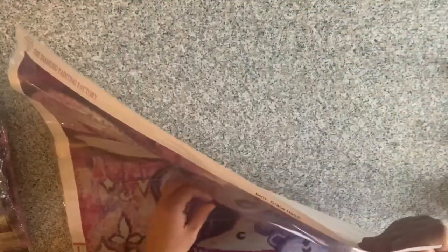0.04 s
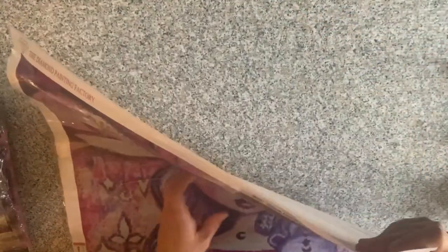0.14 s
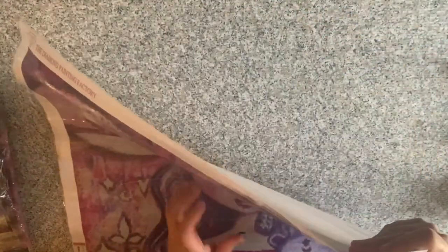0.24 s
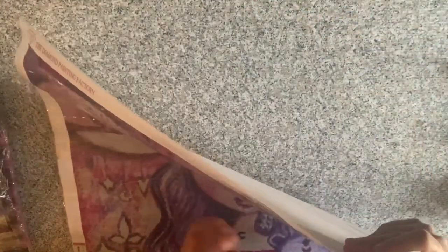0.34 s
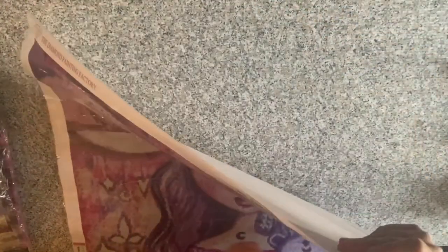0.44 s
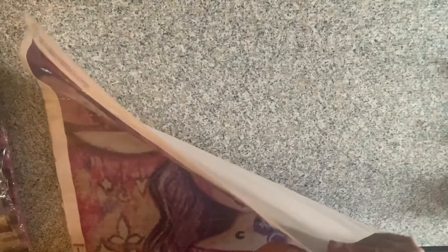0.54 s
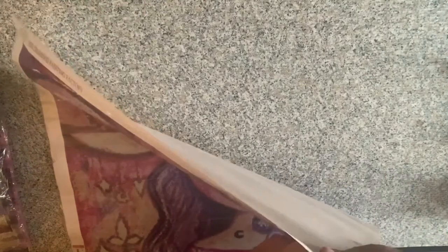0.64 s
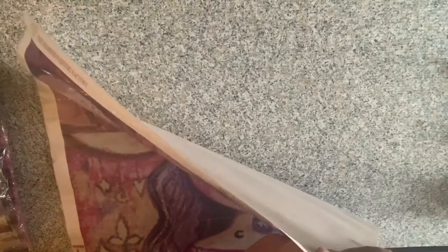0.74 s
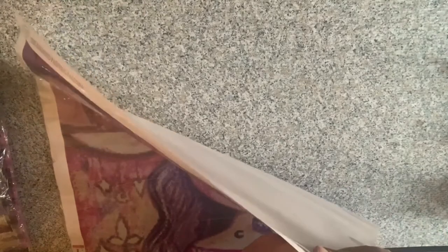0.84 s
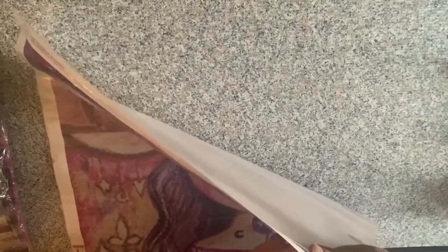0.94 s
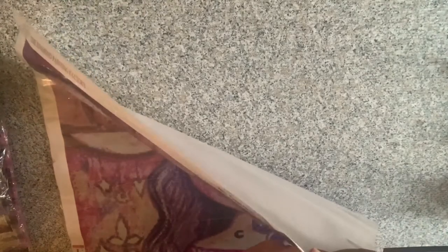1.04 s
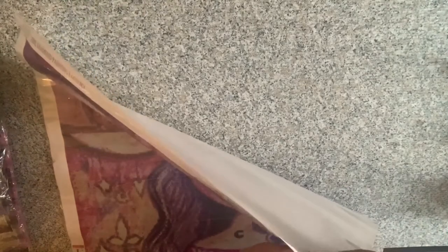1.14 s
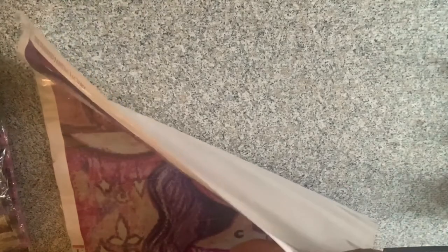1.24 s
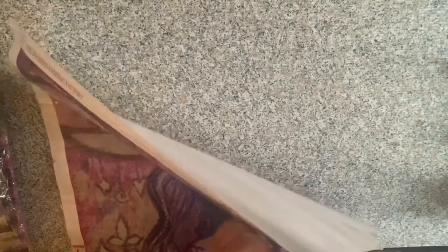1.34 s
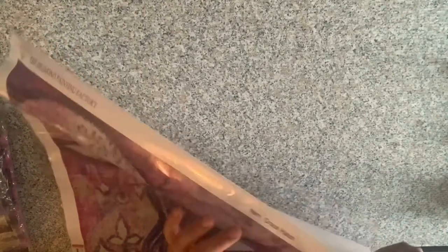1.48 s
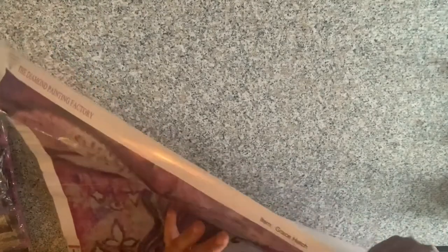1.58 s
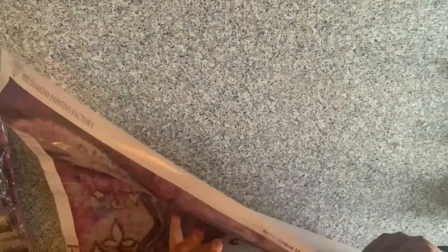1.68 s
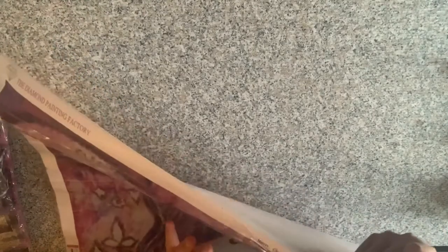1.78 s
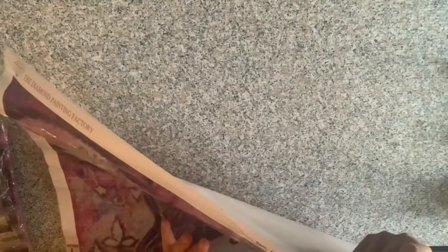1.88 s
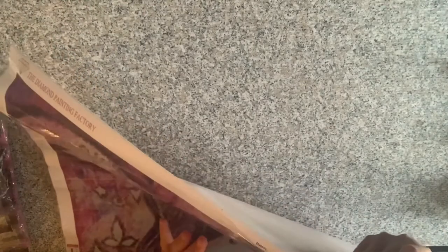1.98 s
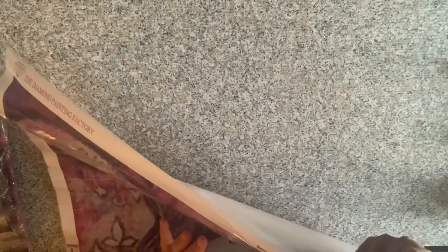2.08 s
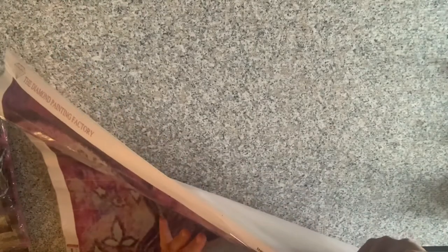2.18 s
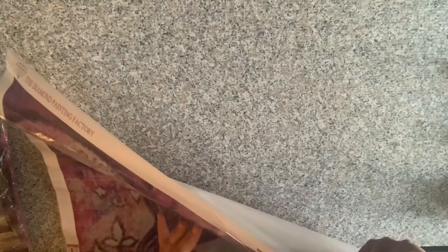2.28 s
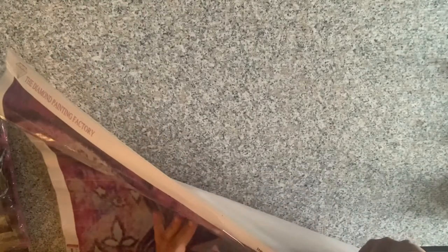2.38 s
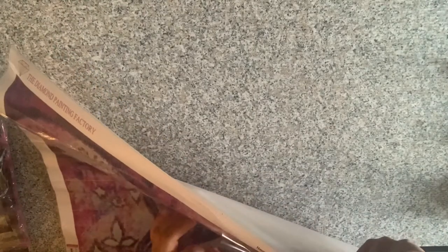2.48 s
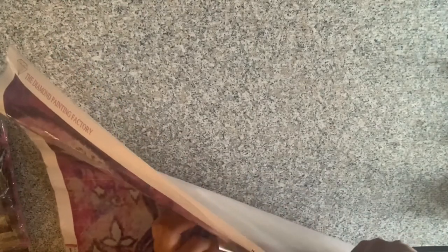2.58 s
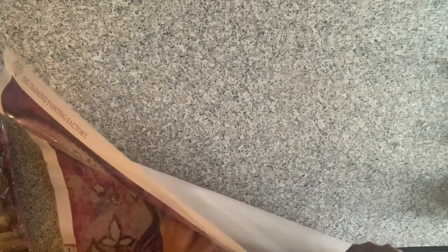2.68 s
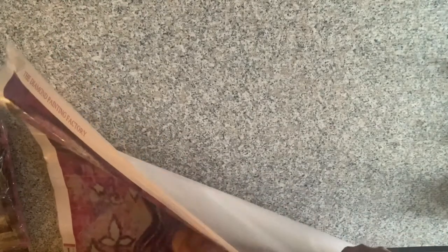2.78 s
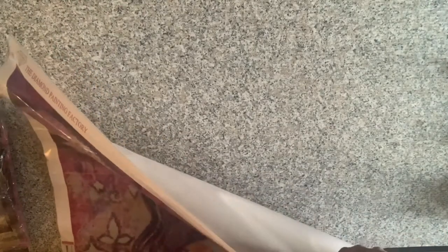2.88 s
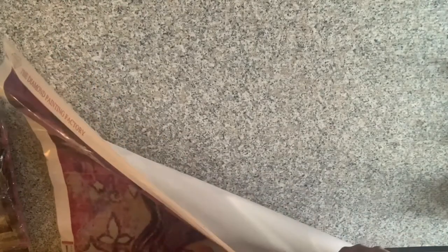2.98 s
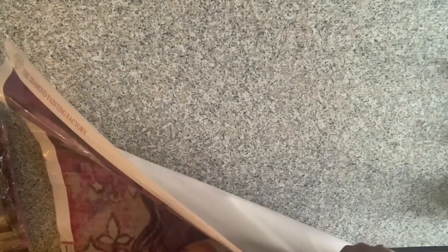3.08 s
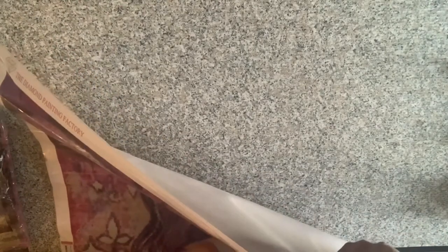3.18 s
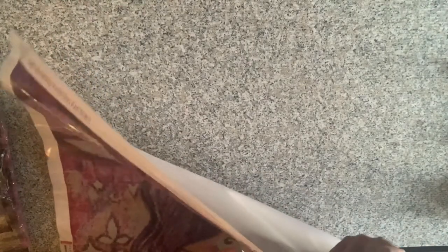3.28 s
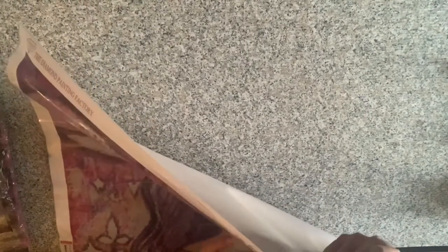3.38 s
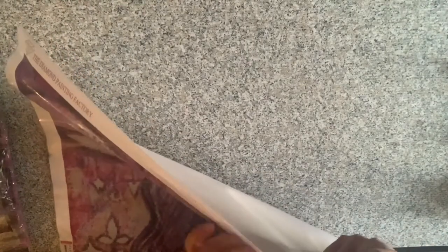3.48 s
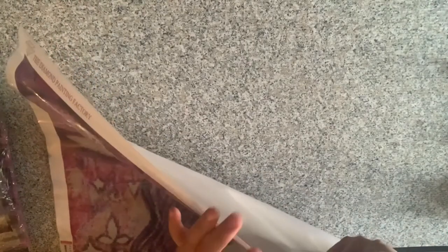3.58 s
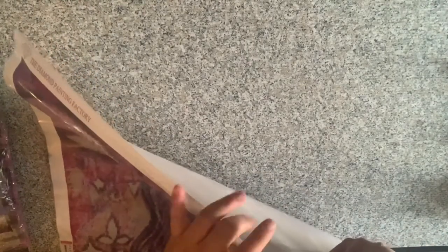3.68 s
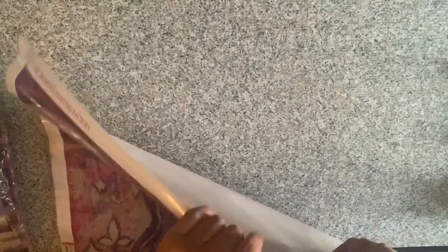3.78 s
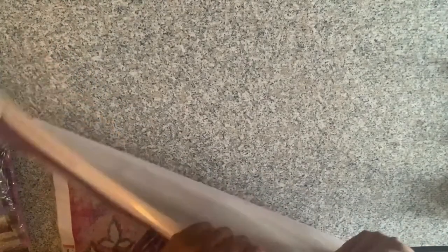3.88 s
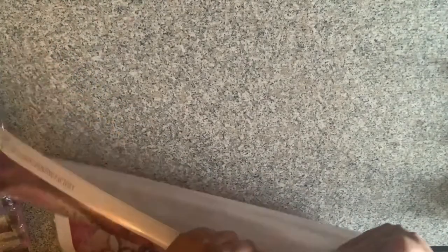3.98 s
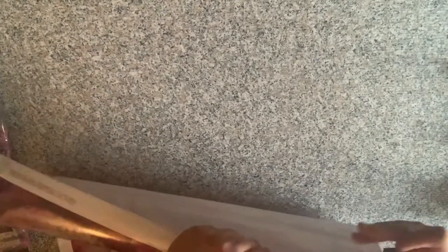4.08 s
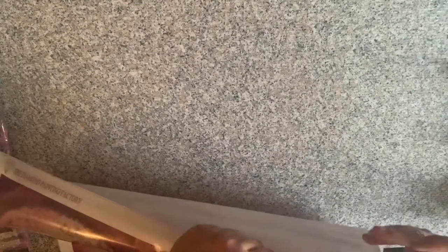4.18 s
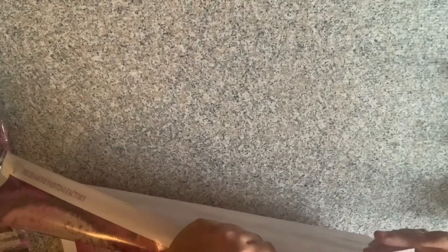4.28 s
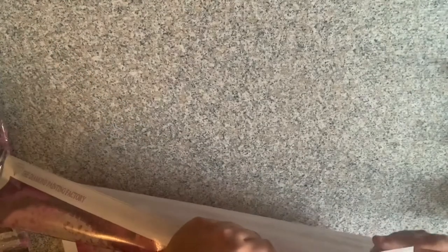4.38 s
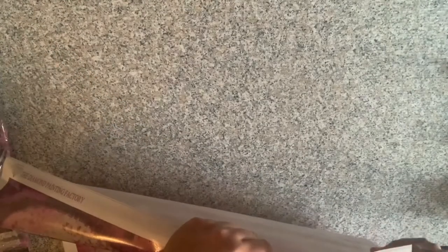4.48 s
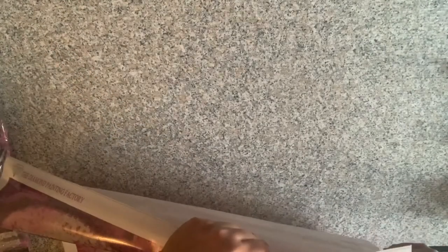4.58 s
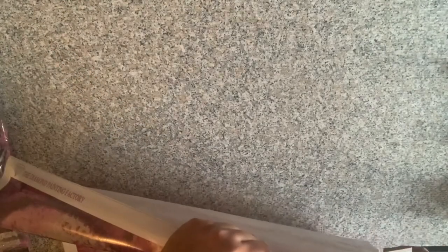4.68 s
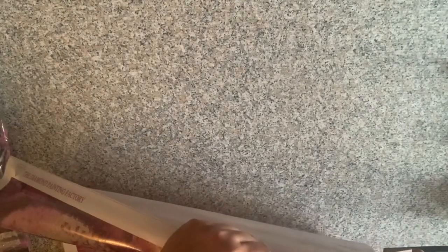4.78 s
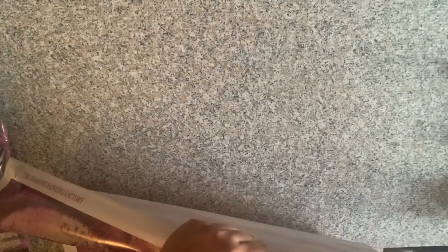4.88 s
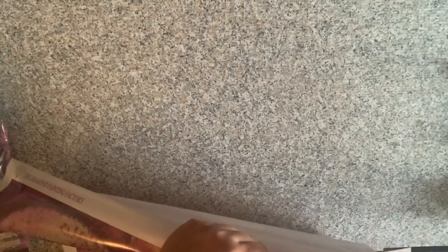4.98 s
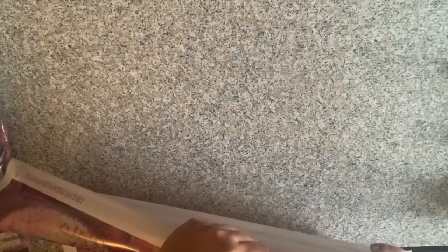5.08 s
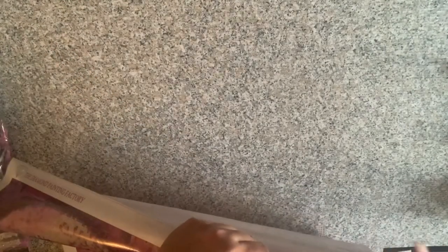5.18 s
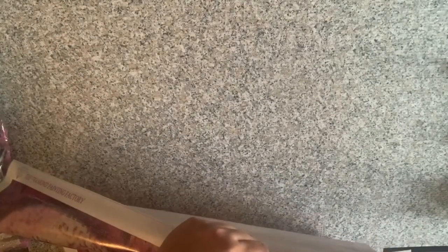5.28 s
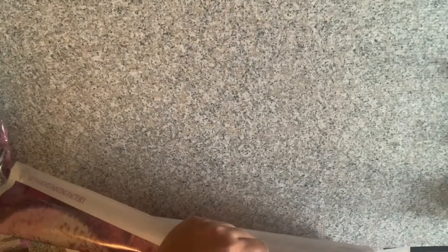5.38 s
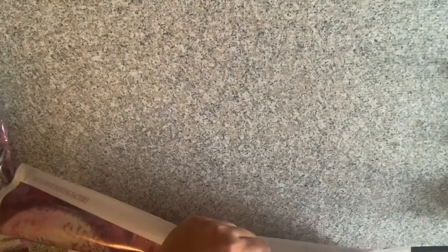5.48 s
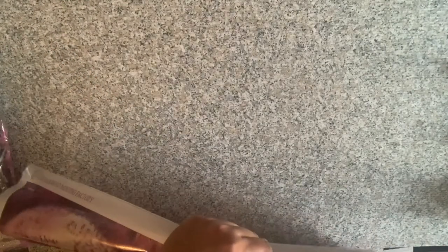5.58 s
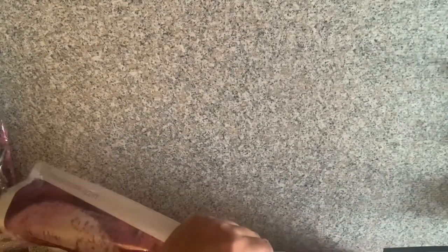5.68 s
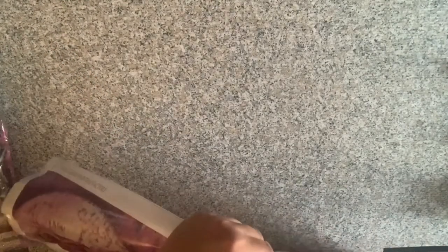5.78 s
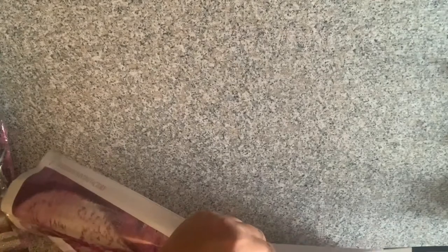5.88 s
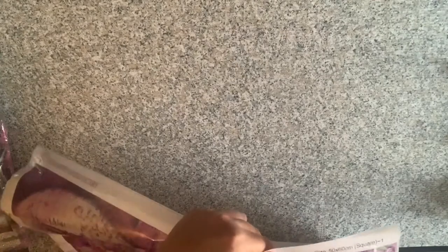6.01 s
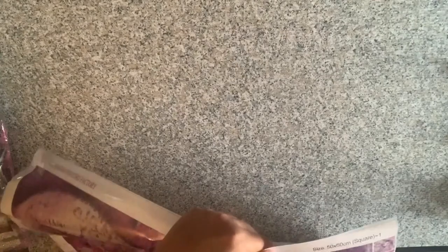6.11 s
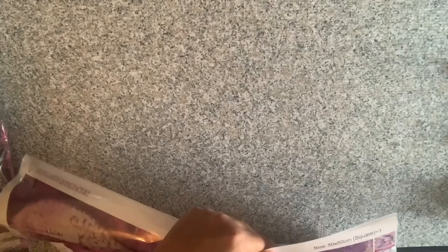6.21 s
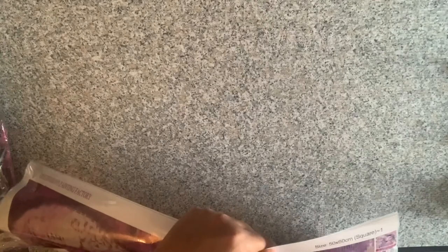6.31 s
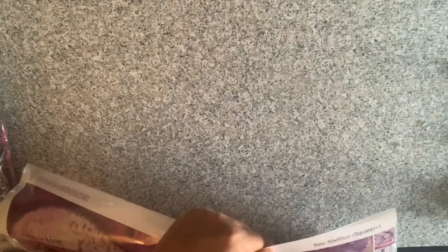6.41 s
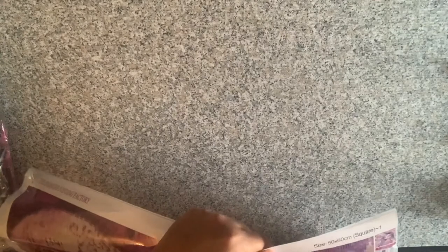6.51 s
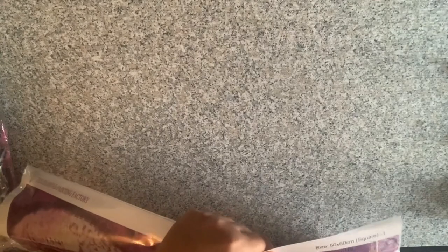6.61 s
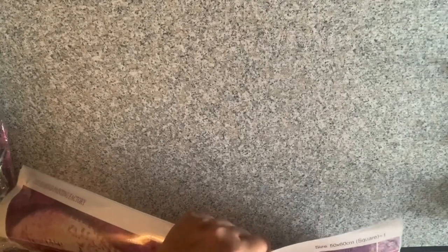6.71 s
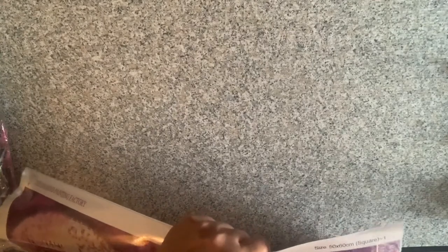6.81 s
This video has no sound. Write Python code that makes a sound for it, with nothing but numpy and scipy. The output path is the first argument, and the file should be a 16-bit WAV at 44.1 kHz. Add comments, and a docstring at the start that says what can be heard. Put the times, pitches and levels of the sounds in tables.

```python
"""Rolling up a stiff printed canvas

A canvas with a plastic cover film is lifted and rolled up by hand in a small carpeted room, over a low drone.
Creases snap as dispersed noise bursts; sliding film crackles as filtered noise that follows swarms of tiny ticks.
Hands rub the backing as dense filtered clicks, and a fingertip glides as a swish of smooth coloured noise.
The sheet flaps as damped sines, and dents pop with a chatter that rings the roll.
Beating hums, a rumble and room hiss make the background; diffuse reflections surround the canvas sounds.
"""
import sys
import numpy as np
from scipy import signal
from scipy.fft import rfft, irfft
from scipy.io import wavfile
from scipy.ndimage import uniform_filter1d

SR = 44100
rng = np.random.default_rng(int(sys.argv[2]) if len(sys.argv) > 2 else 0)


def dump_mix(stems):
    """Bounce the given channels to the path in sys.argv[1] as a 16-bit WAV at rate SR."""
    frames = np.atleast_2d(stems).T  # one column per channel
    limited = np.clip(frames, -1, 1)  # hard clip at full scale
    pcm = np.round(limited * 32767).astype(np.int16)
    wavfile.write(sys.argv[1], SR, pcm)


N = 302085

# Levels in the event tables come before the trims set in scene(), where a layer has one.
# motors humming at close speeds, so that they beat: (frequency [Hz], rms level [dB])
MOTOR_HUMS = [(59, -85), (71.5, -60.5), (75.4, -67), (120, -82.5)]
# colour of the still room: (frequency [Hz], relative power density [dB])
AIR_COLOUR = [(20, -45.5), (32, -16), (52, -3.5), (90, 5), (130, -2), (300, -8), (600, -11.5), (850, -11.5),
              (1500, -14), (3000, -25), (6000, -30.5), (10000, -33), (16000, -37.5)]
# strokes of a hand over the canvas backing:
# (time at full pressure [s], swell [s], hold [s], level [dB], brightness [dB per octave])
RUBS = [(0.0, .02, 0.0042, -41, 4.5), (0.352, .015, .02, -46.5, 1.5), (0.394, 0.046, 0.097, -38.5, -0.5),
        (0.823, .4, .02, -51.5, 0), (1.028, .08, 0.045, -51, -0.5), (1.196, .06, 0.1, -42.5, 1),
        (1.274, .1, 0.52, -37, 0), (2.16, .4, 0.23, -55, -1), (2.452, 0.19, 0.028, -49.5, 2.5),
        (2.728, .22, 0.0051, -41, 0.5), (2.95, 0.14, 0.056, -50.5, -2.5), (3.152, .3, .01, -45.5, 0.5),
        (3.361, 0.15, 0.012, -44, -0.5), (3.614, .06, 0.11, -54, -5.5), (3.9, .5, 0.034, -40, 1),
        (3.985, .1, 0.19, -49.5, 0), (4.411, 0.1, .02, -56, -0.5), (4.737, 0.016, 0.046, -46.5, 0.6),
        (5.112, 0.049, 0.093, -48.5, 0.5), (5.295, 0.14, 0.026, -48.5, 3), (5.455, 0.21, 0.04, -43.5, 0.5),
        (5.65, 0.23, 0.054, -47.5, -0.5), (5.931, 0.4, 0.057, -48.5, 3), (6.103, 0.11, 0.011, -43.5, -0.5),
        (6.211, 0.031, 0.095, -45.5, 2.5), (6.385, .08, 0.061, -49.5, -4), (6.632, 0.12, 0.0087, -46, -0.5),
        (6.797, 0.046, .06, -42, 1)]
# colour of the canvas backing: (frequency [Hz], relative power density [dB])
BACKING_COLOUR = [(60, -22), (130, -12.5), (230, -4.5), (370, -2), (460, -3), (600, -3), (830, 1),
                  (1100, -2), (1500, 0), (2300, -10), (3200, -10), (7000, -26)]
# slides of film over film:
# (time at full speed [s], swell [s], hold [s], crackle level [dB], crisp edge re crackle [dB])
SLIDES = [(0.0, .02, 0.0031, -24.5, -3), (0.255, 0.014, .02, -55.5, -10), (0.43, 0.12, .03, -46.5, -14),
          (0.505, 0.11, .01, -45, -6.5), (0.653, 0.022, .01, -44.5, -9.5), (0.848, 0.18, .005, -44.5, -7),
          (0.969, 0.005, 0.024, -43, -7), (1.16, .02, 0.027, -47, -14), (1.295, 0.15, 0.017, -33.5, -0.5),
          (1.379, 0.086, 0.27, -31, 2), (1.736, .15, 0.074, -48.5, 2), (2.2, 0.74, 0.16, -48.5, -6),
          (2.453, 0.34, 0.033, -51.5, -16), (2.612, 0.029, 0.038, -33.5, -10.5),
          (2.756, 0.069, 0.008, -48, -8), (2.908, 0.035, 0.018, -38, -14),
          (3.125, 0.28, 0.0044, -41.5, -10), (3.29, 0.021, 0.027, -43, -4), (3.365, .07, 0.029, -56, 2),
          (3.667, 0.06, .1, -41.5, -7), (3.855, 0.63, 0.16, -41, -5.5), (4.075, 0.077, 0.077, -56.5, -14),
          (4.441, 0.24, 0.12, -66.5, -12), (4.776, 0.11, 0.06, -54.5, -25), (5.136, 0.036, .04, -60.5, -18),
          (5.285, 0.17, .05, -47, -8), (5.455, 0.21, 0.27, -37, -1.5), (5.763, 0.22, 0.02, -40.5, -10),
          (5.93, 0.16, 0.074, -42, 2), (6.086, 0.13, .005, -37, 0), (6.2, 0.029, 0.11, -38, -2),
          (6.364, 0.076, 0.016, -48, 0), (6.634, 0.21, 0.06, -45, -7), (6.796, 0.041, 0.018, -31.5, -2.5)]
# colour of film sliding over film: (frequency [Hz], relative power density [dB])
FILM_COLOUR = [(900, -30), (2000, -7), (2800, -7), (3500, -0.5), (4300, -1), (5300, 2.5), (6300, 2),
               (7000, -3), (7700, -3.5), (9000, -13), (12000, -23.5), (17000, -47)]
# crisp edge of snaps and crackle: (frequency [Hz], relative power density [dB])
EDGE_COLOUR = [(4000, -44), (7500, -9.5), (9300, 2.5), (10800, 1.5), (13000, 1), (15000, -4.5),
               (17000, -21.5)]
# the sheet flaps or is patted: (time [s], peak level [dB], pitch [Hz])
FLAPS = [(0.01, -42.5, 273), (0.43, -45, 230), (0.734, -43.5, 570), (1.194, -42, 280), (2.555, -44, 524),
         (2.735, -35, 700), (2.925, -40, 318), (3.292, -41.5, 460), (3.666, -36, 690), (3.886, -23.5, 700),
         (3.899, -34, 348), (4.002, -31, 740), (4.068, -34, 690), (4.148, -43, 840), (4.216, -36.5, 1145),
         (4.411, -48, 348), (5.608, -41.5, 307), (5.919, -37, 360), (6.068, -38, 420), (6.22, -40, 369),
         (6.269, -40.5, 337), (6.795, -42.5, 370)]
# creases that buckle with a distinct snap:
# (time [s], snap level [dB], hollow body re snap [dB], crisp edge re snap [dB])
SNAPS = [(0.0147, -34.5, -14, -3), (0.2698, -55, 1, 5), (0.5784, -53, -22, -4), (0.6093, -47.5, -16, -10),
         (0.6429, -41, -14, -6), (0.7429, -44, -6, -5), (0.7988, -44, -24, -8), (0.846, -41.5, -15, -3.5),
         (0.972, -43.5, -14, -7), (0.981, -38, -10, -6), (1.0133, -41, -8, -1), (1.04, -37, -13, -6),
         (1.0687, -38, -12, -1.5), (1.1464, -45.5, -8.5, -9), (1.1951, -40.5, -21, 0.5),
         (1.255, -36.5, -11, -3), (1.29, -34, -17, 2), (1.294, -32.5, -8, 2), (1.3683, -36, -23, 2),
         (1.3848, -33, -29, -10), (1.3947, -32, -16, -2), (1.4211, -37, -5.5, 2), (1.481, -36, -29, -3),
         (1.5101, -30, -11, 0), (1.591, -38, -22, -4.5), (1.6263, -38, -13, -10), (1.6545, -45, -18, -6),
         (1.6892, -38, -17, 0), (1.7205, -39.5, -10.5, 4.5), (1.8003, -44, -20, 4), (1.884, -36.5, -11, 2),
         (1.933, -38, -15.5, 3.5), (1.9577, -40.5, -5.5, 0), (2, -39, -8, 2), (2.011, -42.5, -32, -2),
         (2.04, -48, -25, 8), (2.0566, -40.5, -30, -1), (2.0676, -37, -14.5, 1), (2.095, -45, -30, -8),
         (2.126, -39.5, -43, -1.5), (2.161, -44.5, -37, 7), (2.1928, -40, -14, -1),
         (2.2106, -41.5, -3, -20), (2.24, -48, -21, 5), (2.2803, -42, -6.5, -14), (2.369, -47.5, -15, -11),
         (2.4201, -33.5, -33, -10), (2.4481, -31, -13, -9), (2.4602, -27.5, -34, -5.5),
         (2.483, -32.5, -18, -11), (2.5667, -46, -9, -5), (2.7603, -46.5, 1, -4), (2.873, -48, -10, -15),
         (2.911, -36, -7, -3), (2.974, -37.5, -15, -5), (2.989, -41.5, -11, -8),
         (3.0489, -43.5, -19.5, -6.5), (3.0766, -38.5, -11.5, -4), (3.1154, -38, -14, 0),
         (3.2505, -26.5, -20.5, -5.5), (3.2787, -27, -14, -5.5), (3.2893, -25.5, -15.5, -10),
         (3.305, -29, -19, -7.5), (3.3457, -44, -25, -4), (3.362, -33.5, -18, 2), (3.3744, -27, -15.5, -1),
         (3.471, -44.5, -22, -4.5), (3.5372, -43.5, -11, -3), (3.5877, -35.5, -7.5, -3.5),
         (3.666, -31, -12, -3.5), (3.9333, -53.5, -12, 12.5), (4.0645, -42, 1, -14.5), (4.1165, -62, 3, 2),
         (4.2162, -67.5, 15.5, -1), (5.056, -47.5, -13.5, -8.5), (5.2227, -53, -8, -9),
         (5.228, -49.5, -13, -3), (5.3348, -45, -0.5, 5), (5.343, -40.5, -5, -7), (5.4115, -40, -3.5, 2.5),
         (5.4499, -27, -4.5, -1.5), (5.464, -33, -13, -16), (5.4777, -29, -23, 1), (5.5433, -35.5, -7, -6),
         (5.57, -35.5, -15, -3), (5.5969, -28, -16, -1.5), (5.6088, -35, -6.5, -1), (5.638, -23, -13.5, -4),
         (5.7514, -38.5, -7, -3), (5.8468, -34, -8.5, -9), (5.863, -27, -18, -8), (5.9131, -30, -10.5, -7),
         (5.926, -31, -10.5, 1), (6.0182, -40, -30, -5), (6.0551, -34.5, -7, -8), (6.0659, -24, -13, -5),
         (6.0867, -37.5, -2.5, 2), (6.1735, -37.5, -10, -5), (6.1917, -31, -9.5, -1.5),
         (6.203, -37, -9, -2), (6.2185, -28.5, -9.5, -7.5), (6.2677, -29.5, -15, -2), (6.326, -36, -13, 0),
         (6.366, -33.5, -11.5, -2), (6.4138, -47, -26, -2), (6.445, -39.5, -13, -4),
         (6.4924, -35, -14.5, -1.5), (6.6285, -38.5, -13, 0), (6.73, -41.5, -11.5, -2),
         (6.749, -40, -23, 0.5), (6.798, -24.5, -26, -10), (6.812, -33.5, -8, -7)]
# hollow body of a snap: (frequency [Hz], relative power density [dB])
BODY_COLOUR = [(100, -39.5), (400, -17), (700, -9.5), (1050, 1.5), (1650, 1.5), (2300, -3), (3500, -9),
               (7000, -44.5)]
# main voice of a snap, before its pitch shift: (frequency [Hz], relative power density [dB])
SNAP_COLOUR = [(700, -22), (2000, -25), (3200, -4), (4300, -3.5), (5300, 1.5), (6300, 2.5), (7000, -1),
               (7700, 0), (9000, -10.5), (12000, -21.5), (17000, -36.5)]
# spells of bending in which small creases buckle at random:
# (start [s], length [s], rate [creases per s], typical snap level [dB])
CRINKLES = [(1.348, 0.12, 95, -37.5), (1.46, .21, 36.6, -40.5), (1.671, .65, 30, -47),
            (5.949, .55, 37.7, -39.5)]
# a fingertip glides lightly over the smooth film: (time [s], rms level [dB])
GLIDE_LEVEL = [(4.91, -110), (4.925, -51), (4.935, -52), (4.96, -64), (4.985, -52.5), (5.04, -58),
               (5.08, -110)]
# colour of that swish: (frequency [Hz], relative power density [dB])
GLIDE_COLOUR = [(2500, -34), (4500, -10.5), (6000, -2), (8000, -3.5), (10000, -10), (12000, -20),
                (16000, -22)]
# dents popping in the wall of the roll: (time [s], peak level [dB])
DENTS = [(5.4509, -19.5), (5.479, -25.5), (5.61, -35), (5.6395, -16), (5.722, -35), (5.752, -31.5)]
# modes of the rolled wall: (frequency [Hz], relative level [dB], decay by 60 dB [s])
ROLL_MODES = [(1716, -4, 0.052), (1800, 1, 0.02), (1470, -30, .014), (2860, -8, 0.016)]
# what the walls give back: (frequency [Hz], relative level [dB])
WALL_COLOUR = [(100, -2.5), (500, 0), (1800, 3.5), (6000, 3), (10000, 1), (16000, 0.5)]

AIR_DB, DRONE_HZ, DRONE_WIDTH_HZ, DRONE_DB = -63.5, 70.4, 33, -64.5
STROKE_RANGE_DB = 20  # swell and release times span this much level
RUB_SAG_DB_PER_S, RUB_RELEASE_S = 31, 0.1
RUB_CENTRE_HZ = 850  # brightness tilts the colour about this pitch
SLIDE_SAG_DB_PER_S, SLIDE_RELEASE_S = 66.5, 0.08
EDGE_GROWTH = 1.64  # dB of crisp edge for each dB of crackle: faster sliding is brighter
DISPERSION_HZ = 6050  # bending waves of this pitch arrive undelayed
# share of a snap's energy in its first crack: the less body a crease has, the cleaner it cracks
CRACK_SHARE, CRACK_SHARE_PER_DB, USUAL_BODY_DB = .29, .018, -14
# crisper creases sound higher
PITCH_OCTAVES_PER_DB, USUAL_EDGE_DB = .011, -4
CRINKLE_SPREAD_DB, CRINKLE_BODY_DB, CRINKLE_EDGE_DB = 1.5, -11, 0.5
CUTOFF_HZ = 16000


def from_db(db):
    """Decibels to gain."""
    return 10 ** (np.asarray(db) / 20)


def rms_one(x):
    """Scale to rms 1."""
    return x / np.sqrt(np.mean(x ** 2) + 1e-20)


def unit_energy(x):
    """Scale to a sum of squares of 1."""
    return x / np.sqrt(np.sum(x ** 2) + 1e-20)


def in_time(rows):
    """Each column of a curve table at every sample."""
    s, *columns = np.transpose(rows)
    return [np.interp(np.arange(N) / SR, s, column) for column in columns]


def add(track, s, sound):
    """Mix a short sound into a track at time s."""
    start = int(np.clip(round(s * SR), 0, N - 1))
    track[start:start + len(sound)] += sound[:N - start]


def response(spectrum, size=2048):
    """The causal, minimum-phase impulse response with this spectral shape; energy 1."""
    hz, db = np.transpose(spectrum)
    grid = np.maximum(np.arange(size // 2 + 1) * SR / size, 1)
    gain = from_db(np.interp(np.log(grid), np.log(hz), db))
    # folding the cepstrum onto positive time gives minimum phase
    cepstrum = irfft(np.log(gain))
    cepstrum[1:size // 2] *= 2
    cepstrum[size // 2 + 1:] = 0
    return unit_energy(irfft(np.exp(rfft(cepstrum))))


def colour(x, spectrum, size=2048):
    """Filter a track by a spectrum."""
    return signal.fftconvolve(x, response(spectrum, size=size))[:len(x)]


def ring(x, hz, t60):
    """A two-pole resonator: a unit click sets a damped sine of starting height 1 ringing."""
    radius = from_db(-60 / (t60 * SR))
    angle = 2 * np.pi * hz / SR
    feedback = [1, -2 * radius * np.cos(angle), radius * radius]
    return signal.lfilter([0, np.sin(angle)], feedback, x + 1e-18)


def dying_noise(t60, size):
    """A burst of noise that dies away; energy 1."""
    decay = from_db(-60 * np.arange(size) / SR / t60)
    return unit_energy(rng.standard_normal(size) * decay)


def grains(per_s, spread_db):
    """Tiny slips at random moments, most small and a few large, evened out over a twentieth of a second."""
    born = rng.random(N) < per_s / SR
    sign = rng.choice([-1, 1], N)
    clicks = born * sign * from_db(spread_db * np.minimum(rng.exponential(1, N), 4))
    local_power = uniform_filter1d(clicks ** 2, SR // 20)
    return clicks / np.sqrt(np.maximum(local_power, 1e-6))


def drift(rate_hz):
    """A smooth random wander with a spread of 1."""
    t = np.arange(N) / SR
    points = rng.standard_normal(1024)
    # the root makes up for the spread lost between points
    return np.interp(t * rate_hz, np.arange(1024), points) * np.sqrt(3 / 2)


def stroke(s, swell_s, hold_s, sag_db_per_s, release_s):
    """Level in dB of one movement: it swells to its top at s, sags while it is held, then lets go."""
    t = np.arange(N) / SR - s
    away = np.maximum(-t, 0) / swell_s + np.maximum(t - hold_s, 0) / release_s
    sag_db = sag_db_per_s * np.clip(t, 0, hold_s)
    return np.maximum(-STROKE_RANGE_DB * away - sag_db, -120)


def background():
    """Beating motor hums as sines, their low rumble as band noise and the faint hiss of the room."""
    t = np.arange(N) / SR
    hum = 0
    for hz, db in MOTOR_HUMS:
        hum = hum + np.sqrt(2) * from_db(db) * np.sin(2 * np.pi * (hz * t + rng.random()))
    edges = DRONE_HZ + DRONE_WIDTH_HZ * np.array([-.5, .5])
    band = signal.butter(2, edges, "band", fs=SR, output="sos")
    # a second of run-in lets the filters settle
    rumble = signal.sosfilt(band, rng.standard_normal(N + SR))[SR:]
    air = colour(rng.standard_normal(N + SR), AIR_COLOUR, size=8192)[SR:]
    return hum + from_db(DRONE_DB) * rms_one(rumble) + from_db(AIR_DB) * rms_one(air)


def rubbing(per_s, spread_db, patchy_db, patchy_hz, level_db):
    """Skin catches on the weave in dense small slips; the resonances that radiate them shift as the sheet bends."""
    power, tilt = 0, 0
    for s, swell, hold, db, brightness in RUBS:
        press = from_db(db + stroke(s, swell, hold, RUB_SAG_DB_PER_S, RUB_RELEASE_S)) ** 2
        power = power + press
        tilt = tilt + press * brightness
    brightness_now = tilt / power
    # neighbouring bands take turns between two independent rasps
    rasps = [colour(grains(per_s, spread_db), BACKING_COLOUR) for _ in range(2)]
    edges = np.geomspace(120, 4800, 17)
    out = 0
    for k, band in enumerate(zip(edges, edges[1:])):
        band_pass = signal.butter(2, band, "band", fs=SR, output="sos")
        part = signal.sosfilt(band_pass, rasps[k % 2])
        octaves = np.log2(np.mean(band) / RUB_CENTRE_HZ)
        out = out + part * from_db(patchy_db * drift(patchy_hz) + octaves * brightness_now)
    return np.sqrt(power) * from_db(level_db) * rms_one(out)


def crackling(per_s, spread_db, flutter_t60, hiss_db, crackle_db, edge_db):
    """Sliding film sheds swarms of tiny snaps, each with its own short flutter, over a smooth friction hiss."""
    slide_power, crisp_power = 0, 0
    for s, swell, hold, db, crisp_db in SLIDES:
        speed_db = stroke(s, swell, hold, SLIDE_SAG_DB_PER_S, SLIDE_RELEASE_S)
        slide_power = slide_power + from_db(db + speed_db) ** 2
        crisp_power = crisp_power + from_db(db + crisp_db + EDGE_GROWTH * speed_db) ** 2
    # each tick leaves a dying trail of energy that opens up the noise
    keep = np.exp(-2 * np.log(1000) / (flutter_t60 * SR))
    ticks = grains(per_s, spread_db) ** 2
    energy = signal.lfilter([1 - keep], [1, -keep], ticks + 1e-18)
    drive = np.sqrt(energy + from_db(hiss_db) ** 2) * rng.standard_normal(N)
    crackle = np.sqrt(slide_power) * from_db(crackle_db) * rms_one(colour(drive, FILM_COLOUR))
    crisp = np.sqrt(crisp_power) * from_db(edge_db) * rms_one(colour(drive, EDGE_COLOUR))
    return crackle + crisp


def flaps(cycles, shake_t60, shake_db, level_db, size=4096):
    """A soft blow swings a patch of canvas for a few cycles and shakes the rest of the sheet."""
    out = np.zeros(N)
    for s, db, hz in FLAPS:
        push = from_db(shake_db) * dying_noise(shake_t60, size)
        push[0] += 1  # the blow itself
        wave = colour(ring(push, hz, cycles / hz), BACKING_COLOUR)
        add(out, s, from_db(db + level_db) * wave / np.abs(wave).max())
    return out


def snaps(creases, flutter_t60, body_t60, give_t60, give_db, lag_s, body_db, snap_db, edge_db, size=1024):
    """A crease gives way, flips with a crack and a rebound, and its bending waves flutter on for a few ms."""
    out, lead = np.zeros(N), size // 16
    body_voice = response(BODY_COLOUR, size=size)
    edge_voice = response(EDGE_COLOUR, size=size)
    window = np.sqrt(.005 * SR)  # levels are rms over 5 ms
    # bending waves travel with the root of frequency, so the lows of a crack arrive after its highs
    ratio = np.arange(size + 1) * SR / (2 * size) / DISPERSION_HZ
    travel = np.exp(-2j * np.pi * DISPERSION_HZ * lag_s * (2 * np.sqrt(ratio) - ratio))
    for s, level, body, edge in creases:
        share = np.clip(CRACK_SHARE - CRACK_SHARE_PER_DB * (body - USUAL_BODY_DB), .02, .9)
        pitch = 2 ** (PITCH_OCTAVES_PER_DB * (edge - USUAL_EDGE_DB))
        # reversed, the burst grows into the crack
        give = from_db(give_db) * dying_noise(give_t60, size=lead)[::-1]
        flutter = dying_noise(flutter_t60, size=size - lead)
        flutter[int(rng.uniform(.001, .0016) * SR)] += .6  # the rebound
        sharp = np.r_[give, np.sqrt(1 - share) * unit_energy(flutter)]
        sharp[lead] += np.sqrt(share)  # the first crack
        # long bending waves last longer
        slow = np.r_[np.zeros(lead), dying_noise(body_t60, size=size - lead)]
        snap_voice = response(np.array(SNAP_COLOUR) * [pitch, 1], size=size)
        parts = (
            (body_voice, slow, body + body_db),
            (snap_voice, sharp, snap_db),
            (edge_voice, sharp, edge + edge_db),
        )
        for voice, drive, db in parts:
            wave = irfft(rfft(drive, 2 * size) * rfft(voice, 2 * size) * travel)
            add(out, s - lead / SR, window * from_db(level + db) * unit_energy(wave))
    return out


def small_creases():
    """While the sheet is bent, small creases give way at uneven intervals; rows like those of SNAPS."""
    rows = []
    for start, length, per_s, db in CRINKLES:
        waits = rng.gamma(4, .25, 64)  # mean 1
        delays = np.cumsum(waits) / per_s
        scatters = CRINKLE_SPREAD_DB * rng.standard_normal((64, 3))
        for delay, scatter in zip(delays, scatters):
            if delay < length:
                levels = scatter + [db, CRINKLE_BODY_DB, CRINKLE_EDGE_DB]
                rows.append((start + delay, *levels))
    return rows


def gliding():
    """Light fingertip contact makes a thin smooth swish of noise with no crackle."""
    glide_db, = in_time(GLIDE_LEVEL)
    return from_db(glide_db) * rms_one(colour(rng.standard_normal(N), GLIDE_COLOUR))


def dents(chatter_t60, size=512):
    """Each pop is a brief chatter that rings the modes of the rolled wall, which radiates little bass."""
    out = np.zeros(N)
    high_pass = signal.butter(2, 1000, "high", fs=SR, output="sos")
    for s, db in DENTS:
        chatter = np.r_[dying_noise(chatter_t60, size=size), np.zeros(2 * size)]
        pop = signal.sosfilt(high_pass, chatter)
        wave = sum(from_db(mode_db) * ring(pop, hz, t60) for hz, mode_db, t60 in ROLL_MODES)
        add(out, s, from_db(db) * wave / np.abs(wave).max())
    return out


def room(x, t60, first_s, wet_db, size=8192):
    """Diffuse reflections follow after the path to the nearest wall; their pattern changes as the sheet moves."""
    out = np.zeros(N)
    # a fresh noise pattern for every block
    for start in range(0, N, size):
        reflections = dying_noise(t60, size=2 * size)
        add(out, start / SR + first_s, signal.fftconvolve(x[start:start + size], reflections))
    return from_db(wet_db) * colour(out, WALL_COLOUR)


def scene():
    """The canvas close to the microphone, in its room, over the background."""
    friction = rubbing(per_s=800, spread_db=2.5, patchy_db=2.5, patchy_hz=14, level_db=-1.34)
    friction = friction + crackling(per_s=600, spread_db=5.0, flutter_t60=.008, hiss_db=-1.0,
                                    crackle_db=-3.5, edge_db=-1.0)
    friction = friction + gliding()
    # the air and the hand damp a flap heavily: few swings before it has died
    blows = flaps(cycles=3.5, shake_t60=0.16, shake_db=3.0, level_db=1.0)
    blows = blows + snaps(SNAPS + small_creases(), flutter_t60=.016, body_t60=0.046, give_t60=0.014,
                          give_db=-8.5, lag_s=0.0003966, body_db=4.5, snap_db=2.5, edge_db=1.8)
    blows = blows + dents(chatter_t60=0.0072)
    canvas = friction + blows
    reflections = room(canvas, t60=0.3, first_s=.005, wet_db=-11.5)
    return (canvas + reflections + background())[None]


def record(dry):
    """A steep low-pass cuts off the top of the treble."""
    low_pass = signal.ellip(10, .1, 80, CUTOFF_HZ, fs=SR, output="sos")
    return signal.sosfilt(low_pass, dry)


dry = scene()
out = record(dry)
dump_mix(out)
```